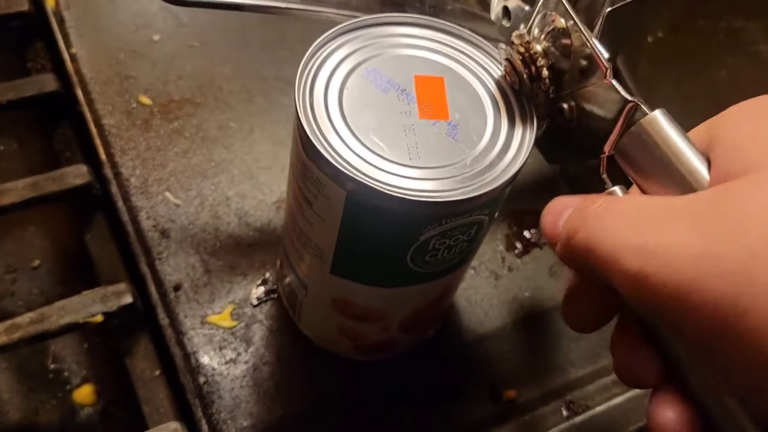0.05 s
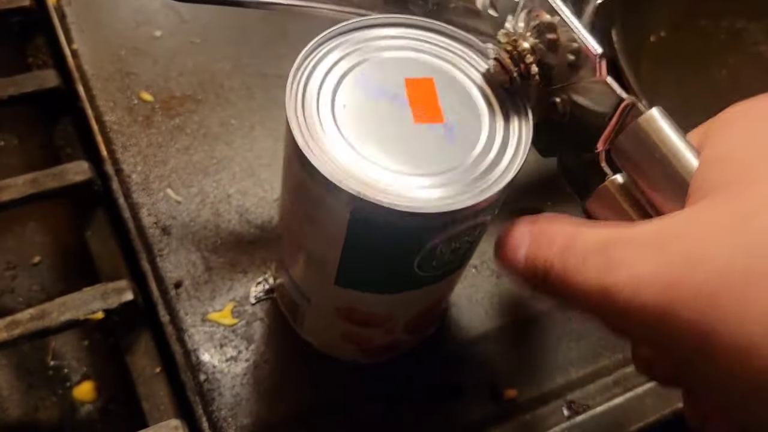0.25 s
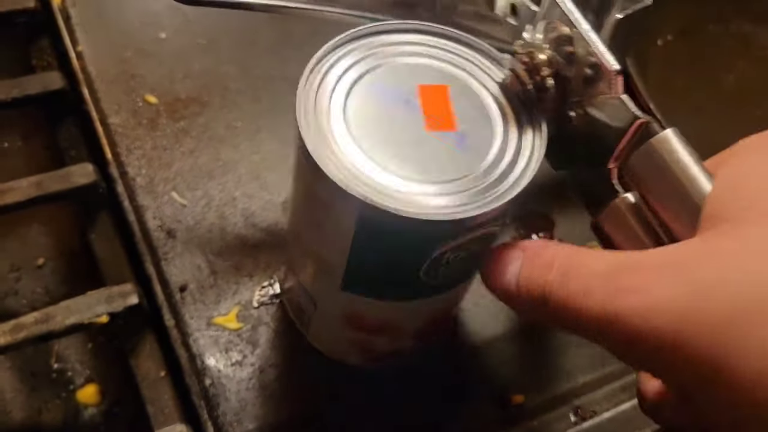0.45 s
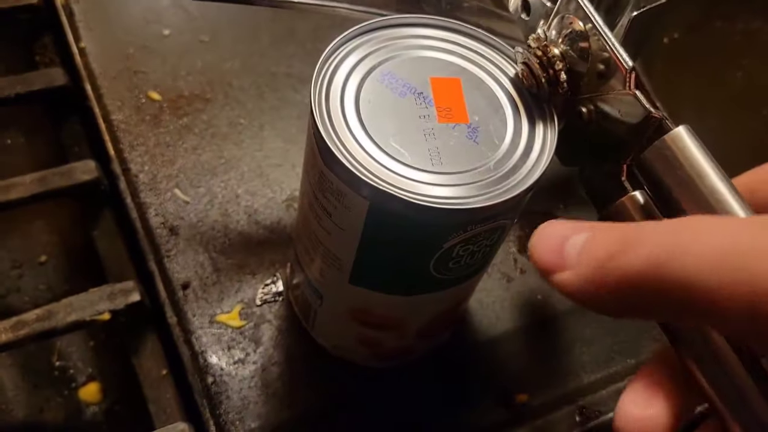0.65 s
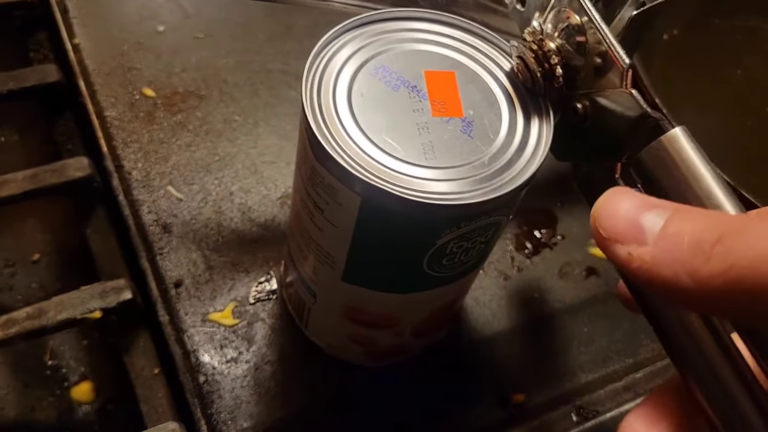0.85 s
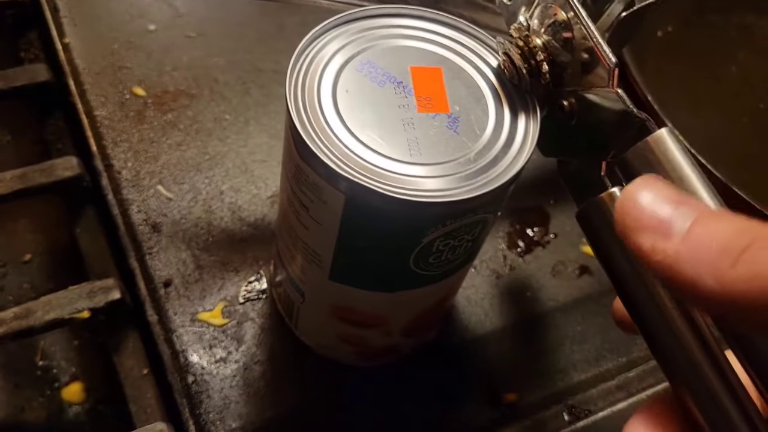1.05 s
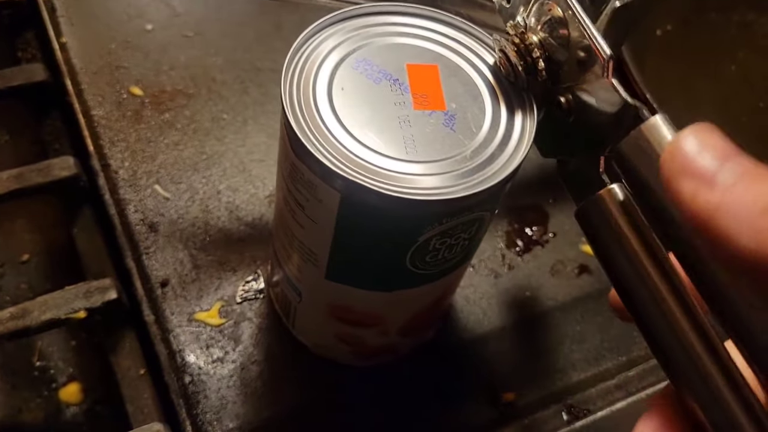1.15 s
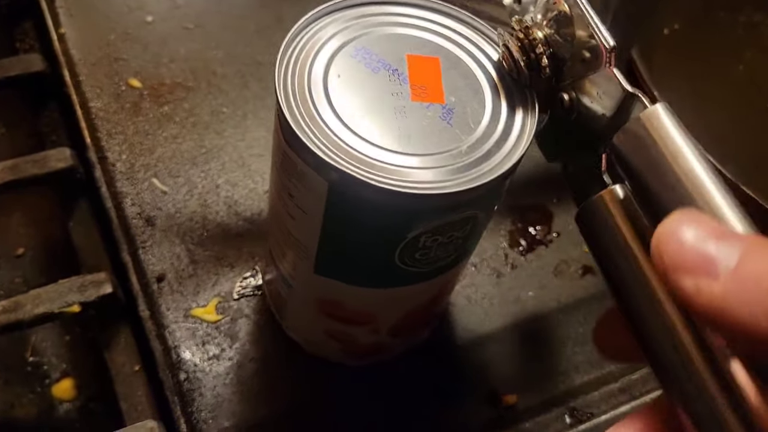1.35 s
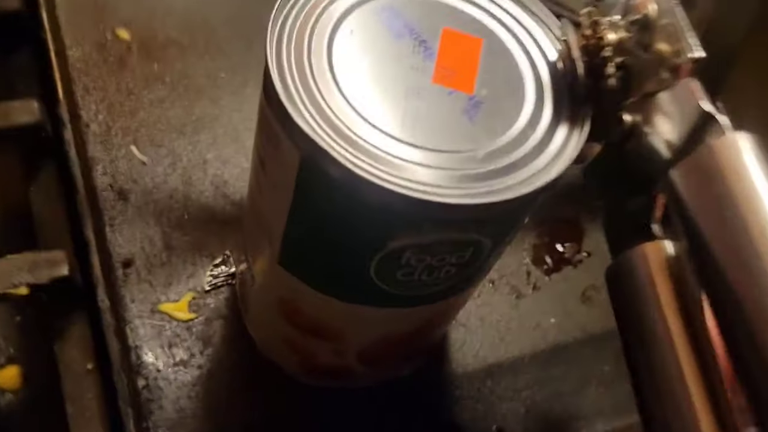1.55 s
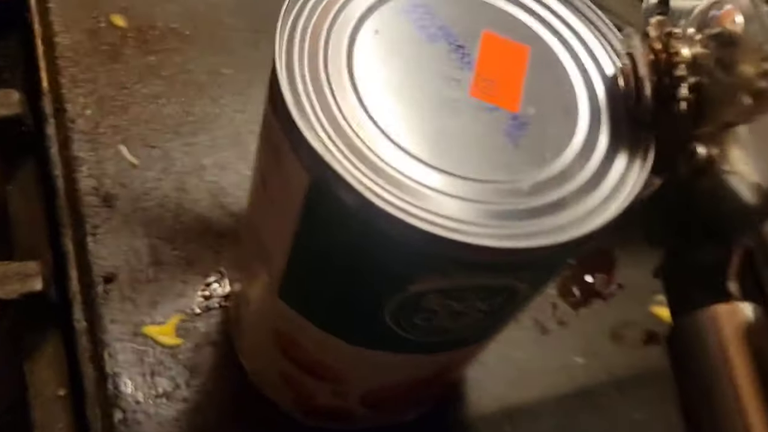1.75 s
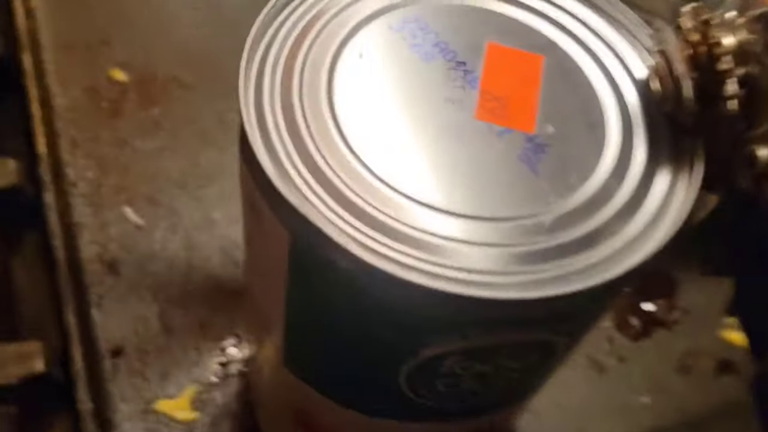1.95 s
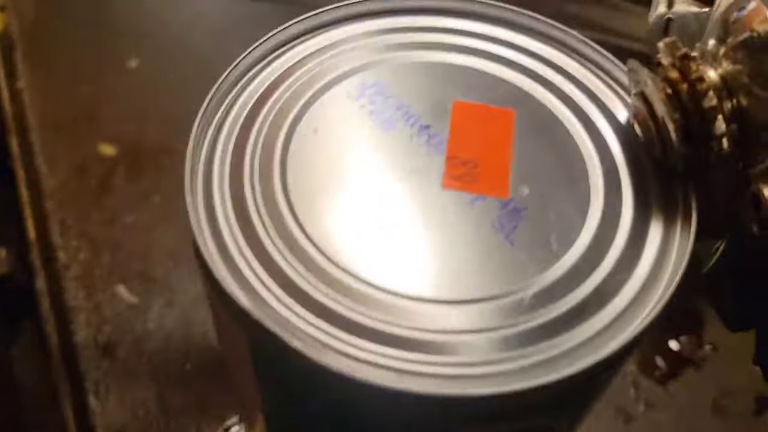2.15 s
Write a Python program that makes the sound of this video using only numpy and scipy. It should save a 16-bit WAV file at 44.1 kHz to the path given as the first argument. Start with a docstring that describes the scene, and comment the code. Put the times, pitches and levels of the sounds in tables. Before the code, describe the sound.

A can opener bites into a steel lid: a very brief gritty creak, then a loud metallic snap at 0.39 seconds, with clatter and a full-can ring. At 0.63 the can thumps and scrapes on the hob, damping the ring. Faint airy hiss and tiny gliding whistles follow until 1.2. Handling clicks at 1.58, 1.92 and 2.13, with rustle and bumps. Close stereo, small kitchen, low fridge hum.

```python
"""Can opener biting through a lid

The wheel creaks into a steel lid; the lid snaps and the can rings until it thumps down on the hob.
Can: decaying modes and tearing noise. Drag on the hob: noise through resonances, plus a groan.
Air through the slit: shaped noise and gliding whistles. Camera ticks and rustle; dull bumps (sines):
the can's landing knock near 0.63 s, later pushes on the camera.
Small kitchen: wavering fridge hum over noise; decaying noise is the walls' answer to the can."""
import sys
import numpy as np
from scipy import signal
from scipy.fft import rfft, irfft, next_fast_len
from scipy.io import wavfile
from scipy.ndimage import map_coordinates

SR = 44100
rng = np.random.default_rng(int(sys.argv[2]) if len(sys.argv) > 2 else 0)


def to_wav(sig):
    """Store sig (one row per channel, or 1-D mono) as 16-bit WAV at the path in sys.argv[1].

    Samples outside -1..1 are clipped; the rate is SR.
    """
    pcm = np.clip(np.atleast_2d(sig), -1, 1) * 32767
    pcm = np.round(pcm).astype(np.int16)
    wavfile.write(sys.argv[1], SR, pcm.T)  # frames by channels


def decibels_to_gain(level_db):
    """Convert a level in decibels to a linear amplitude gain (20 dB per decade)."""
    exponent = np.asarray(level_db, float) / 20
    return 10 ** exponent


N = 97064
T = np.arange(N) / SR
LEFT_ONLY = np.array([[1], [0]])
SNAP_S, LAND_S = 0.3873, 0.630


def unit(x):
    """Scale to rms 1."""
    return x / np.sqrt(np.mean(x ** 2) + 1e-20)


def along(points, hz):
    """Interpolate (f/Hz, value) points on a log frequency axis."""
    f, value = np.transpose(points)
    return np.interp(np.log(hz + 1), np.log(f + 1), value)


def level(rows, column=1):
    """Gain from a dB curve over time; -150 dB outside it."""
    rows = np.array(rows)
    return decibels_to_gain(np.interp(T, rows[:, 0], rows[:, column], -150, -150))


def wobble(knots_per_s):
    """Smooth random curve through normal knots."""
    knots = rng.standard_normal(int(N * knots_per_s / SR) + 4)
    return map_coordinates(knots, [T * knots_per_s])


def filtered(x, response):
    """Apply a frequency response by FFT, zero-padded."""
    m = next_fast_len(N + SR // 2)
    return irfft(rfft(x, m) * response(np.fft.rfftfreq(m, 1 / SR)), m)[..., :N]


def pan(left_over_right_db):
    """Left and right gains, half the difference each."""
    return decibels_to_gain([[left_over_right_db / 2], [-left_over_right_db / 2]])


def rush(spectrum, alike):
    """Stereo noise, rms 1; mid/side split sets the left-right correlation at each frequency."""
    def split(hz):
        turn = np.arccos(np.clip(along(alike, hz), -1, 1)) / 2
        return decibels_to_gain(along(spectrum, hz)) * [np.cos(turn), np.sin(turn)]

    mid, side = filtered(rng.standard_normal((2, N)), split)
    return unit(np.array([mid + side, mid - side]))


def dying(start_s, t60_s):
    """Zero before the start, then exponential decay."""
    return (T >= start_s) * decibels_to_gain(-60 * np.maximum(T - start_s, 0) / t60_s)


# wheel grit: f/Hz, relative density/dB
GRIT_SPECTRUM = [(1500, -11.5), (4500, 4.5), (7000, -3), (9000, -19), (12000, -21), (16000, -32)]


def creak():
    """Wheel digging in: a wavering tone and grit swell exponentially, cut off at the snap."""
    creak_hz, tone_db, grit_db, rise_db_per_s = 2105, -32, -29.5, 1499
    t = T - SNAP_S
    dig = (t < 0) * decibels_to_gain(rise_db_per_s * np.minimum(t, 0)) * pan(15.9)
    tone = decibels_to_gain(tone_db + 6 * wobble(300)) * np.sin(2 * np.pi * creak_hz * t)
    return dig * (tone + decibels_to_gain(grit_db) * rush(GRIT_SPECTRUM, [(500, .3)]))


# full-can modes: f/Hz, level/dB re snap, t60/s, L-R/dB, left lead/rad
CAN_MODES = [(300, -26, .3, 0, 0), (510, -18, .12, 0, .5), (578, -18, .14, 0, .5), (1000, 3, .035, -1, .8),
             (1037, -10, .2, 0, 1), (1078, -12, .1, 0, 1), (1357, -20, .2, 0, 1), (2186, -28, .22, 0, 1),
             (2444, -26, .14, 0, 2), (2846, -25, .24, -2, 1), (3310, -28, .15, 0, 1),
             (3440, -24, .09, 0, 1), (748, -15.5, .55, -3.8, .9), (1045, -18, .32, 0, 1),
             (1310, -7, .13, 0, 1), (2582, -17, .14, -2, .5), (852, -15, .16, -2, 1),
             (5130, -41, .8, 0, .5), (7483, -53, 1.5, 0, .5)]
# tearing steel: f/Hz, relative density/dB
CRACK_SPECTRUM = [(60, -35), (200, -13), (500, 1), (1000, -5.5), (1600, -9), (2900, -7.5), (4500, -10.5),
                  (5700, -11.5), (7000, -19.5), (9000, -29), (10200, -33.5), (12500, -23.5), (15300, -27.5),
                  (16300, -51.5)]
# hob boom: f/Hz, relative density/dB
BOOM_SPECTRUM = [(40, -24.5), (75, 8), (130, -0.5), (200, 2.5), (300, 7.5), (420, -2), (700, -33)]


def snap():
    """Lid tears: modes ring, damped further on landing; noise cracks, clatters and booms in the hob."""
    snap_db, ring_rise_s, landed_t60_s = -7.5, 0.00085, 0.0404
    # levels re snap
    crack_db, crack_t60_s = -6, 0.0278
    clatter_db, clatter_t60_s = -15.5, 0.22
    boom_db, boom_rise_s, boom_t60_s = -23, 0.005, 0.388
    t = T - SNAP_S
    ring = np.zeros((2, N))
    for hz, db, t60_s, lr_db, lead_rad in CAN_MODES:
        mode = np.sin(2 * np.pi * hz * t + lead_rad * LEFT_ONLY)
        ring += decibels_to_gain(db) * pan(lr_db) * dying(SNAP_S, t60_s) * mode
    landed = decibels_to_gain(-60 * np.maximum(T - LAND_S, 0) / landed_t60_s)
    ring = ring * landed * np.clip(t / ring_rise_s, 0, 1)
    tearing = decibels_to_gain(crack_db) * dying(SNAP_S, crack_t60_s)
    clatter = decibels_to_gain(clatter_db) * dying(SNAP_S, clatter_t60_s)
    crack = rush(CRACK_SPECTRUM, [(500, 0.36)]) * (tearing + clatter)
    boom = decibels_to_gain(boom_db) * rush(BOOM_SPECTRUM, [(200, .8)]) * dying(SNAP_S, boom_t60_s)
    boom = boom * np.clip(t / boom_rise_s, 0, 1)
    return decibels_to_gain(snap_db) * (ring + crack + boom)


# can rocking and dragging on the hob: t/s, level/dB
SLIDE_LEVEL = [(.628, -75), (.636, -36.5), (.652, -29), (.69, -38.5), (.712, -48), (.74, -48), (.76, -59),
               (.8, -60.5), (.86, -80.5)]
# can and hob resonances: f/Hz, width/Hz, relative level/dB
HOB_MODES = [(142, 230, -7.5), (310, 60, 0), (440, 35, -11.5), (577, 33, -3.5), (747, 29, -8),
             (1054, 156, -14), (2400, 4100, -33)]


def slide():
    """Rough contact noise through can and hob resonances, with a groan sinking as the can settles."""
    groan_hz, sag_hz_per_s, groan_db = 317.8, 250, -4.5  # level re slide

    def body(f):
        total = 0
        for k, (centre, width, db) in enumerate(HOB_MODES):
            damping = 1j * f * width
            total = total + (-1) ** k * decibels_to_gain(db) * damping / (centre * centre - f * f + damping)
        return total / (1 + (f / 5000) ** 4)

    rough = rng.standard_normal((2, N)) * decibels_to_gain(2.8 * wobble(150))
    scrape = unit(filtered(rough[0] + .5 * rough, body))  # mostly common to both sides
    t = T - LAND_S
    groan_cycles = (groan_hz - sag_hz_per_s * t / 2) * t
    groan = decibels_to_gain(groan_db + 6.6 * wobble(58)) * np.sin(2 * np.pi * groan_cycles)
    return level(SLIDE_LEVEL) * pan(0.51) * (scrape + groan)


# wall decay: f/Hz, t60/s
WALL_DECAY = [(200, .35), (1000, 0.4), (4000, 0.21), (12000, .2)]


def room(x):
    """Walls' answer: convolution with noise in which each frequency dies at its own speed."""
    late_samples = 200
    hz, t, z = signal.stft(rng.standard_normal((2, SR // 2)), SR, nperseg=256)
    decay = decibels_to_gain(-60 * t / along(WALL_DECAY, hz)[:, None])
    tail = signal.istft(z * decay, SR, nperseg=256)[1]
    tail = tail / np.linalg.norm(tail[0])
    return signal.fftconvolve(np.pad(x, ((0, 0), (late_samples, 0))), tail, axes=1)[:, :N]


# slit whistles: start t/s, end t/s, start f/Hz, end f/Hz, level/dB before pan
SLIT_WHISTLES = [(.885, 0.913, 4600, 5600, -61), (.905, 0.953, 5470, 5150, -54),
                 (0.937, 0.989, 4850, 4680, -54), (.98, 1.02, 4250, 3850, -54),
                 (0.943, 0.976, 7260, 7070, -58), (0.986, 1.012, 6170, 5930, -60),
                 (1.02, 1.07, 5850, 5900, -72.5), (1.074, 1.106, 3200, 3240, -50.5),
                 (1.079, 1.117, 6500, 4820, -51), (1.107, 1.155, 3050, 3113, -52.5),
                 (1.11, 1.154, 4430, 3430, -53), (1.108, 1.15, 6064, 6140, -50.5),
                 (1.135, 1.166, 6300, 4730, -62), (1.155, 1.19, 2400, 1660, -66)]


def whistles():
    """Slit tones: sines with jittered gliding pitch and wavering level, each under a rounded arch."""
    blur_hz = 95
    out = np.zeros(N)
    for start_s, end_s, start_hz, end_hz, db in SLIT_WHISTLES:
        u = np.clip((T - start_s) / (end_s - start_s), 0, 1)
        hz = start_hz + (end_hz - start_hz) * u + blur_hz * wobble(230)
        arch = np.abs(np.sin(np.pi * u)) ** 0.4
        out += decibels_to_gain(db + 3.2 * wobble(150)) * arch * np.sin(2 * np.pi * np.cumsum(hz) / SR)
    return out


# first gulp of air: t/s, level/dB before pan
PUFF_LEVEL = [(.63, -64), (.65, -59), (.676, -65.5), (.686, -49), (.718, -43.5), (.74, -54.5), (.76, -68.5),
              (.78, -62.5)]
# gulp: f/Hz, relative density/dB
PUFF_SPECTRUM = [(1180, -45), (2000, -12), (2320, -30), (3260, -9), (4650, -12), (5070, -9), (6590, -1.5),
                 (9010, -21), (13200, -15.5), (16000, -21)]
# thin, very high fizz: t/s, level/dB before pan
FIZZ_LEVEL = [(.8, -80), (.814, -60), (.826, -49.5), (.834, -64), (.862, -74), (.9, -96), (1.76, -88),
              (1.82, -71), (1.88, -71), (1.92, -78)]
# fizz: f/Hz, relative density/dB
FIZZ_SPECTRUM = [(5880, -53), (10000, -9), (12900, -10.5), (14600, 4), (15500, -22), (16000, -25)]
# hiss: t/s, level/dB before pan, treble re hiss/dB
HISS_LEVEL = [(.78, -78, 4), (.83, -61, -11), (.88, -62, -6), (.95, -64, -4), (1.0, -55.5, -9.5),
              (1.04, -50.5, -8), (1.09, -51, -16.5), (1.14, -56.5, -14.5), (1.17, -61.5, -20),
              (1.21, -87, -15)]
# hiss: f/Hz, relative density/dB
HISS_SPECTRUM = [(1500, -17), (2500, -8), (3200, -3.5), (4500, -5), (6200, 5), (7600, -4), (9000, -24),
                 (11000, -48)]
# hiss treble: f/Hz, relative density/dB
HISS_TREBLE = [(7500, -32), (9000, 0), (13000, 5), (15200, 6), (16200, -29.5)]


def air():
    """Air drawn through the slit: turbulence noise as gulp, fizz and hiss, with whistles."""
    alike = [(500, 0.73)]
    gulp = level(PUFF_LEVEL) * decibels_to_gain(1.7 * wobble(120.6)) * rush(PUFF_SPECTRUM, alike)
    fizz = level(FIZZ_LEVEL) * rush(FIZZ_SPECTRUM, alike)
    treble = level(HISS_LEVEL, column=2) * rush(HISS_TREBLE, alike)
    hiss = level(HISS_LEVEL) * (rush(HISS_SPECTRUM, alike) + treble)
    return (gulp + fizz) * pan(9) + (hiss + whistles()) * pan(11.5)


# shell ticks: t/s, level/dB before pan, f/Hz, body re tick/dB, L-R/dB, second f/Hz
SHELL_TICKS = [(.3336, -43.5, 6380, -23, 19, 4060), (1.5751, -29, 2654, 1, 13, 5620),
               (1.783, -49.5, 2800, -5, 23, 4900), (1.9196, -11.5, 2800, -12.5, -5.5, 3860),
               (1.9225, -19, 3540, -21.5, -7.5, 5250), (2.0184, -23, 4210, -2.5, 9.5, 3100),
               (2.1291, -9.5, 3370, -39, -12, 2480), (2.1328, -18, 3340, -1, 10, 7400),
               (2.1369, -15, 2840, -34, 13.5, 4540)]
# tick noise: f/Hz, relative density/dB
SHELL_SPECTRUM = [(500, -10.5), (2000, -2.5), (6000, -6.5), (8500, -20), (10000, -31), (13000, -17.5),
                  (16500, -33)]


def ticks():
    """Camera shell: two tones in opposite sense at the two ports, noise and a body tone; far port late."""
    tick_t60_s, body_hz, body_t60_s, rise_s, far_port_s = .0065, 1000, .009, 0.00035, .00022
    second_db, spit_db = -6, -4  # re tick
    out = np.zeros((2, N))
    spit = decibels_to_gain(spit_db) * rush(SHELL_SPECTRUM, [(500, 0.025)])
    for start_s, db, hz, body_db, lr_db, second_hz in SHELL_TICKS:
        late_s = far_port_s * np.array([[lr_db < 0], [lr_db > 0]])
        t = np.maximum(T - start_s - late_s, 0)
        ring = np.sin(2 * np.pi * hz * t) + decibels_to_gain(second_db) * np.sin(2 * np.pi * second_hz * t)
        tick = decibels_to_gain(-60 * t / tick_t60_s) * (ring * [[1], [-1]] + spit)
        body = decibels_to_gain(body_db - 60 * t / body_t60_s) * np.sin(2 * np.pi * body_hz * t)
        out += decibels_to_gain(db) * pan(lr_db) * (tick + body) * np.clip(t / rise_s, 0, 1)
    return out


# can's landing knock near 0.63 s, later pushes: t/s, level/dB before pan and decay, f/Hz, L-R/dB
DULL_BUMPS = [(0.6317, -15.5, 570, 9), (0.6325, -32, 1080, 8), (0.653, -39, 1110, 12), (1.569, -37, 790, 6),
              (1.580, -30, 800, 4), (1.9216, -26, 343, -18.5), (1.9224, -29.5, 157, -20),
              (1.9364, -34, 1500, -19), (2.0, -43, 600, -3.5), (2.0199, -34, 350, 11),
              (2.0313, -34, 900, 0), (2.038, -37, 700, 9), (2.0435, -36.5, 720, 16), (2.061, -42, 616, 6),
              (2.1227, -23, 613, -16), (2.1241, -26, 356, -15.5), (2.139, -20.5, 55.3, -5),
              (2.152, -40.5, 62, -1)]


def bumps():
    """Can's landing knock, then pushes on the camera: sines rising and dying in set cycle counts."""
    rise_cycles, t60_cycles = 0.48, 5.74
    out = np.zeros((2, N))
    for start_s, db, hz, lr_db in DULL_BUMPS:
        cycles = np.maximum(T - start_s, 0) * hz
        envelope = decibels_to_gain(-60 * cycles / t60_cycles) * np.clip(cycles / rise_cycles, 0, 1)
        out += decibels_to_gain(db) * pan(lr_db) * np.sin(2 * np.pi * cycles) * envelope
    return out


# fingers shifting on the camera: t/s, level/dB before pan
RUSTLE_LEVEL = [(0, -57), (.1, -65), (.16, -85.5), (1.38, -84), (1.47, -64), (1.53, -60.5), (1.56, -57.5),
                (1.62, -55), (1.68, -67), (1.76, -76), (1.84, -57), (1.905, -70), (1.925, -42),
                (1.96, -55.5), (1.98, -66), (2.02, -55), (2.06, -54), (2.1, -52.5), (2.125, -35.5),
                (2.15, -53.5), (2.17, -55.5), (2.21, -58)]
# rustle: f/Hz, relative density/dB
RUSTLE_SPECTRUM = [(88, -18.5), (150, -14.5), (297, -12.5), (1240, -17.5), (1870, -21), (6390, -23),
                   (8560, -45.5), (14800, -41.5), (16000, -58.5)]


def rustle():
    """Finger friction: shaped noise with a fluttering level."""
    noise = rush(RUSTLE_SPECTRUM, [(300, 0.23), (3000, 0.067)])
    return level(RUSTLE_LEVEL) * decibels_to_gain(4.4 * wobble(60.09)) * pan(7.5) * noise


# fridge hum: f/Hz, rms level/dB before pan, L-R/dB, left lag/rad
FRIDGE_HUM = [(59.1, -44, -2, 0.45), (119.5, -62, -1, 0.057)]
# room noise: f/Hz, relative density/dB
KITCHEN_SPECTRUM = [(15, -4.5), (30, -3), (50, 1.5), (80, 3), (120, 5), (160, -6.5), (250, -9.5),
                    (340, -5.5), (500, -11.5), (1000, -17.5), (1600, -22.5), (2800, -17), (4000, -22),
                    (6300, -18), (7500, -22.5), (8500, -39.5), (10000, -43.5), (13000, -35.5), (15500, -38),
                    (16500, -59.5)]
# room noise: f/Hz, left-right correlation
KITCHEN_ALIKE = [(60, 1), (240, 0.55), (950, 0.14), (3770, 0.081), (15000, 0.055)]


def kitchen():
    """Fridge hum, sines wavering in level and phase, over the room's own noise."""
    hum_waver_db, phase_waver_rad, noise_db, noise_waver_db = 0.35, 0.68, -55, 0.44
    hum = np.zeros((2, N))
    for hz, rms_db, lr_db, lag_rad in FRIDGE_HUM:
        gain = np.sqrt(2) * decibels_to_gain(rms_db + hum_waver_db * wobble(11.56)) * pan(lr_db)
        phase = 2 * np.pi * hz * T + phase_waver_rad * wobble(3.4) - lag_rad * LEFT_ONLY
        hum += gain * np.sin(phase)
    noise = rush(KITCHEN_SPECTRUM, KITCHEN_ALIKE)
    return hum + decibels_to_gain(noise_db + noise_waver_db * wobble(1.3)) * noise


def scene():
    """All sources; the walls answer the creak, snap and slide."""
    room_db = -17
    can = creak() + snap() + slide()
    knocks_and_handling = ticks() + bumps() + rustle()
    return can + decibels_to_gain(room_db) * room(can) + air() + knocks_and_handling + kitchen()


def roll_off(x):
    """The treble ends steeply here."""
    return signal.sosfilt(signal.butter(12, 16650, fs=SR, output="sos"), x)


def record(dry):
    """Finished stereo mix, at the scene's own level."""
    return roll_off(dry)


dry = scene()
out = record(dry)
to_wav(out)
```